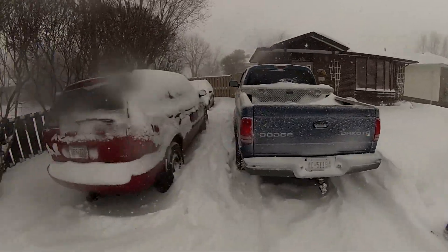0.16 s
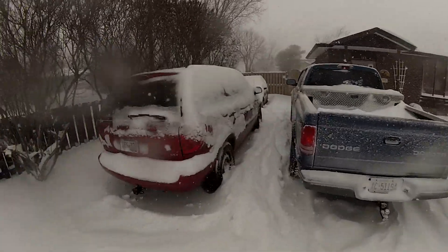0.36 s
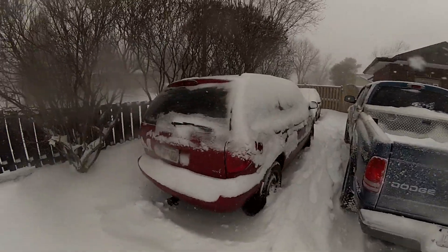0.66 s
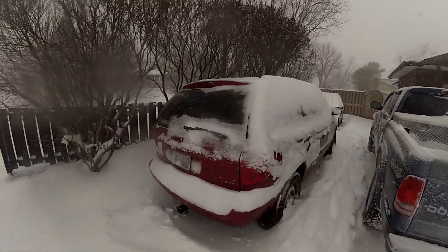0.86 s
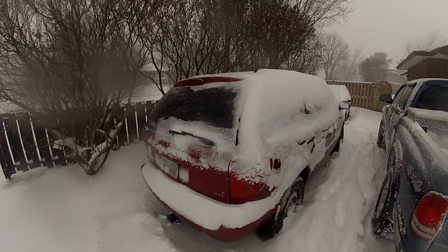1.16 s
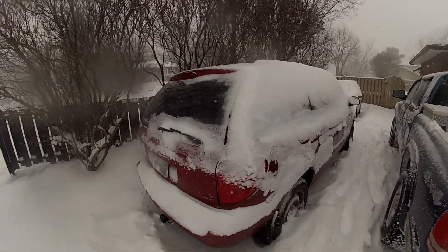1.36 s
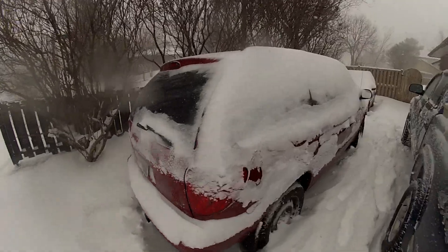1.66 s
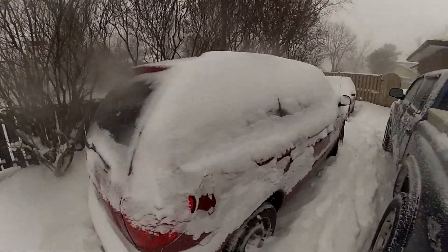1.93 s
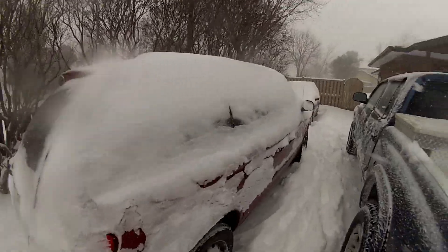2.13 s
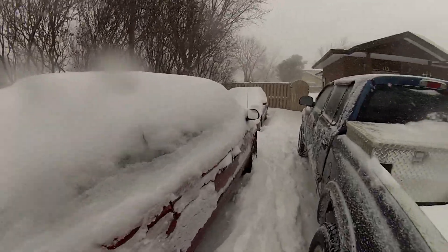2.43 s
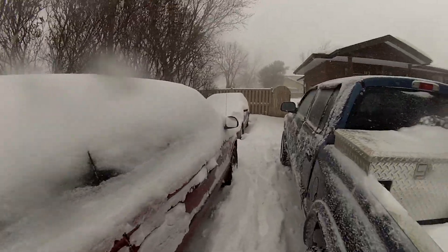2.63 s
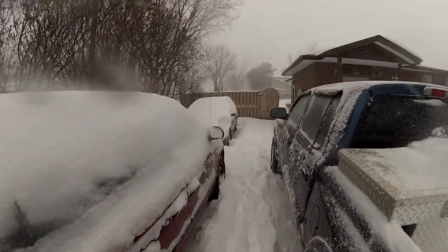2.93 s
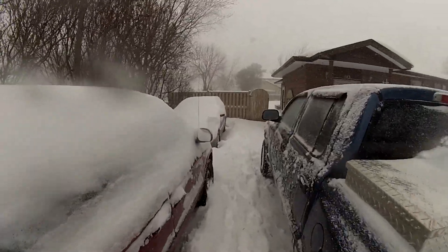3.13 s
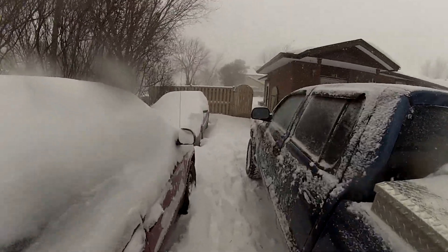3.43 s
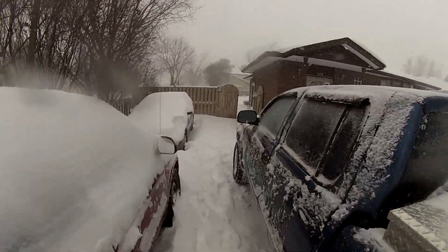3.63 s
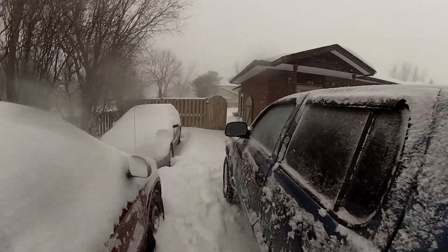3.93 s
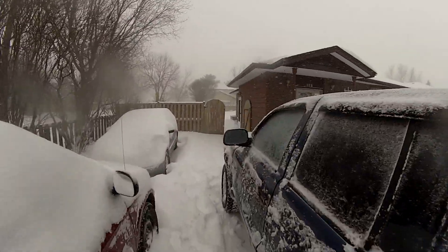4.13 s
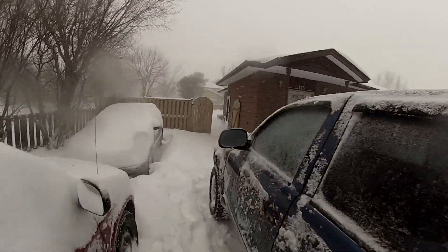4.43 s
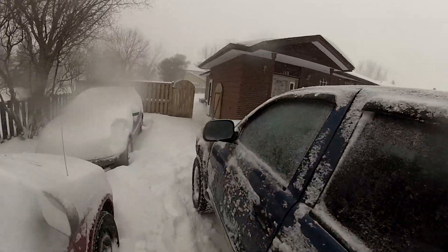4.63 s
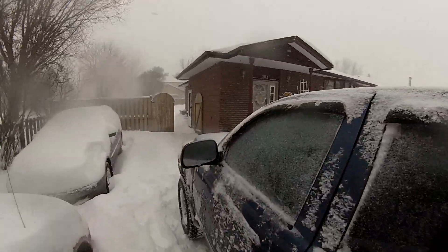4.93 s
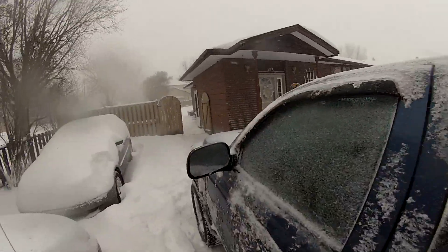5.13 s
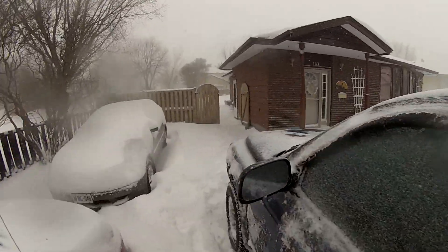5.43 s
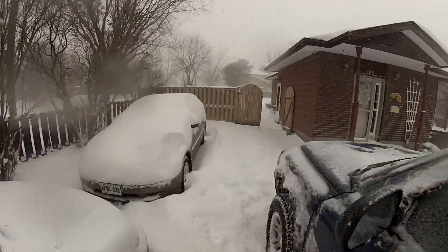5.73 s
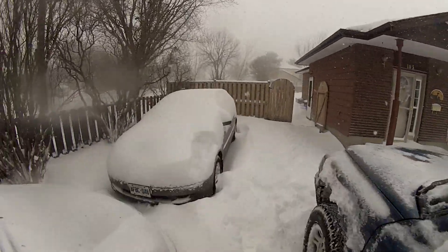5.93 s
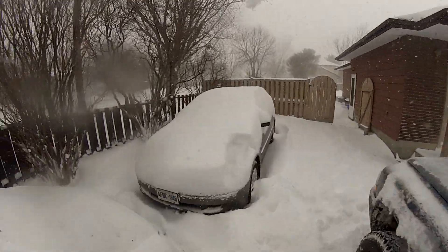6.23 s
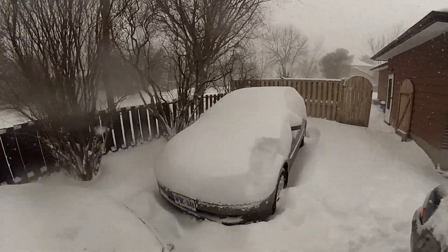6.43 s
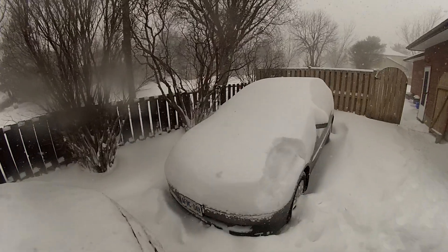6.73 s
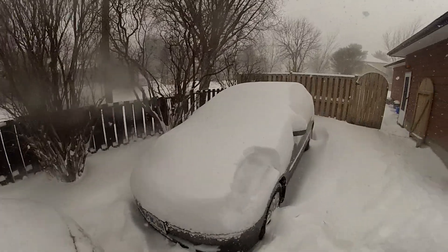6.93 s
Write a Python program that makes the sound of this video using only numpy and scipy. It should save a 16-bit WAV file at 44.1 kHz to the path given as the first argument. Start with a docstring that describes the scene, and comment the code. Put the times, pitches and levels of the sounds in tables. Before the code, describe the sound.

Strong blizzard wind buffets a small microphone outdoors, a loud uneven low rumble with hard thumps, a few sharp icy clicks, easing at the end.

```python
"""A blizzard at the microphone port of a small camera carried between parked cars. From the start a breeze
rumbles at the port as noise eddies, bare trees behind rush and hiss, and fine grains patter. From 0.1 s gusts
swell, with lulls between, and hard buffets hit as single pressure peaks that rasp at their crests. From 0.8 s
grains tick and icy clumps smack as ringing noise bursts, and snow swishes softly in bands of noise. From about
2.5 s the branches whistle as a wandering hoarse tone; past 5.5 s the buffets end and the wind eases."""
import sys
import numpy as np
from scipy import signal
from scipy.fft import rfft, irfft
from scipy.io import wavfile
from scipy.ndimage import uniform_filter1d

SR = 44100
rng = np.random.default_rng(int(sys.argv[2]) if len(sys.argv) > 2 else 0)


def persist_wave(psi):
    """Save psi, clipped to +-1, as 16-bit WAV."""
    counts = np.round(np.clip(psi, -1, 1) * 32767).astype(np.int16)
    wavfile.write(sys.argv[1], SR, np.atleast_2d(counts).T)


N = 311787
T = np.arange(N) / SR
FREQS = np.fft.rfftfreq(N, 1 / SR) + 1e-3  # the offset keeps logarithms finite

# Level and strength columns are settings, before the trims in the functions and the diaphragm.
# Breeze at the port: (time [s], large eddy level [dB], middle eddy level [dB])
BREEZE_LEVELS = [(0.0, -31, -31), (0.72, -30, -34), (0.97, -31.5, -54), (1.33, -29, -36.5),
                 (1.57, -32, -47.5), (1.92, -34.5, -39.5), (2.17, -27.5, -31), (2.69, -28.5, -64),
                 (3.1, -20, -34.5), (3.45, -24, -34.5), (4.05, -25.5, -37.5), (5.3, -20.5, -26.5),
                 (5.98, -40, -47), (6.55, -39, -57), (7.07, -39, -42.5)]
# Gusts at the port: (start [s], hold [s], large eddy level [dB], middle eddy level [dB])
GUST_EVENTS = [(0.115, 0.13, -20.5, -27), (0.763, 0.057, -25, -30), (0.885, 0.016, -28.5, -38),
               (1.045, 0.2, -24, -34), (1.712, 0.013, -24, -32), (2.154, 0.014, -29, -40),
               (2.227, 0.12, -20, -60), (2.425, 0.099, -35, -30), (2.546, 0.056, -24, -30),
               (2.742, 0.021, -27, -29.5), (2.851, 0.087, -20, -45), (3.004, 0.013, -37, -23),
               (3.189, 0.037, -17.5, -25), (3.26, 0.059, -22, -23), (3.787, 0.012, -26, -25),
               (3.904, 0.011, -18, -36), (4.111, 0.033, -17.5, -29), (4.315, 0.031, -39, -25),
               (4.542, 0.26, -21.5, -25), (4.803, 0.36, -28, -21.5), (5.224, 0.22, -27, -39),
               (5.453, 0.08, -22.5, -23), (5.638, 0.15, -24.5, -33), (6.178, 0.11, -35, -50.5),
               (6.918, 0.12, -35.5, -42.5)]
# The wind drops out between gusts: (time [s], depth [dB], half length [s])
LULL_EVENTS = [(0.612, 7.5, 0.023), (0.945, 19, 0.019), (0.993, 14, 0.02), (1.635, 13, 0.014),
               (2.382, 12, 0.018), (2.831, 13, 0.019), (3.706, 5.5, 0.03), (3.928, 13, 0.032),
               (4.01, 7.5, 0.037), (4.425, 7.5, 0.028)]
# Eddy spectrum at the port: (frequency [Hz], relative density [dB])
EDDY_SPECTRUM = [(12, -5.5), (25, 3), (70, 3), (110, -5.5), (180, -16.5), (300, -22), (420, -33),
                 (700, -70.5), (1100, -70.5), (1800, -81)]
# Storm in the trees behind: (time [s], rush level [dB], high hiss level [dB])
STORM_LEVELS = [(0.0, -57.5, -70), (0.9, -56.5, -69.5), (1.6, -58, -69.5), (2.2, -58, -68.5),
                (2.5, -57, -68.5), (3.35, -55, -67), (4.55, -55, -66.5), (4.95, -58.5, -74),
                (5.95, -55, -82), (6.5, -56.5, -87), (7.07, -56.5, -73)]
# Spectrum of the rush in the trees: (frequency [Hz], relative density [dB])
TREE_SPECTRUM = [(100, -0.5), (200, 8), (370, 2.5), (550, 0.5), (800, -4), (1200, -0.5), (2000, -2.5),
                 (3000, -8), (4500, -14.5), (7000, -21), (15000, -26)]
# Spectrum of the high hiss: (frequency [Hz], relative density [dB])
HISS_SPECTRUM = [(2000, -35), (5000, 6), (9000, 3.5), (12000, 10), (14800, 9.5), (15600, -5)]
# Hard buffets at the port: (time [s], strength [dB], half width [ms])
BUFFET_EVENTS = [(0.121, -11, 2.3), (0.184, -8.5, 0.87), (0.236, -12, 1.2), (0.577, -15.5, 2.2),
                 (0.829, -4.5, 0.98), (0.839, -15, 2.2), (1.134, -10, 3.4), (1.216, -9.5, 2.56),
                 (2.271, -16, 1.08), (2.861, -9.5, 2.3), (2.907, -10.5, 3.3), (2.932, -5, 0.93),
                 (2.940, -6.5, 0.79), (2.949, -6, 1.74), (3.201, -14, 1.04), (3.236, -4, 1.3),
                 (3.282, -10, 0.98), (3.966, -13, 2.2), (4.039, -34, 0.24), (4.133, -6, 1.9),
                 (4.154, -10, 1.56), (4.162, -3.5, 0.8), (4.217, -8, 2.24), (4.333, -9.5, 1.26),
                 (4.562, -5.5, 0.99), (4.679, -10, 0.5), (4.684, -4, 0.51), (4.698, -15, 0.54),
                 (4.733, -3.5, 0.76), (4.757, -11, 0.51), (4.847, -14.5, 0.46), (4.881, -8, 0.75),
                 (4.917, -7, 0.6), (5.009, -1, 1.1), (5.129, -9, 0.87), (5.15, -15.5, 0.68),
                 (5.171, -3, 0.59), (5.261, -10, 3.1), (5.335, -7.5, 1.08), (5.363, -10.5, 2.5),
                 (5.394, -11, 3.5), (5.528, -9, 1.55)]
# Spectrum of the overloaded microphone's rasp: (frequency [Hz], relative density [dB])
RASP_SPECTRUM = [(600, -9), (1900, 7.5), (2700, -1.5), (3800, 1), (6000, -7), (10000, -10.5), (15000, -24)]
# Hard snow grains on the housing:
# (time [s], strength [dB], body below 4 kHz relative to the tick [dB], ringing pitch [Hz])
GRAIN_EVENTS = [(0.7757, -31.5, -6, 12000), (0.8133, -22.5, -10, 8300), (0.818, -26, -12, 6600),
                (0.8293, -23.5, -3, 3550), (0.8545, -28, -27, 5700), (1.115, -29, -24, 9900),
                (1.311, -29.5, -28, 6600), (2.001, -30.5, -23, 5000), (2.7229, -24, -1.5, 9000),
                (2.7543, -29, 0, 8700), (2.7897, -19, -5, 5200), (3.307, -25, -21, 11900),
                (3.486, -25.5, -18, 5030), (3.702, -26.5, -7, 13400), (4.135, -28, -1.5, 4300),
                (4.5743, -21.5, -9, 13000), (4.5915, -19.5, -6.5, 3300), (4.617, -29, -16, 7000),
                (4.6468, -18.5, -15, 12000), (5.263, -34, 1.5, 3200), (5.511, -28, -25, 10000),
                (5.6364, -27, -9, 4400), (6.461, -32, -7, 9800), (6.722, -31, -12, 14000)]
# Spectrum of a grain's tick: (frequency [Hz], relative density [dB])
TICK_SPECTRUM = [(1800, -18), (3500, 2.5), (9000, -1), (16000, -3)]
# Spectrum of a grain's body: (frequency [Hz], relative density [dB])
BODY_SPECTRUM = [(400, -2), (1200, 5.5), (3600, -3.5), (6500, -47)]
# Clumps of icy snow striking the port: (time [s], strength [dB])
CLUMP_EVENTS = [(0.8285, -28), (3.2, -8), (3.2044, -19), (4.218, -31), (5.007, -42)]
# Spectrum of a crumbling clump: (frequency [Hz], relative density [dB])
CLUMP_SPECTRUM = [(200, 9.5), (500, 9), (1200, -7.5), (2400, -10.5), (3300, -15), (4500, -8), (6000, -15.5),
                  (10700, -13), (15000, -22)]
# Soft swishes in the snow: (time [s], level [dB], half length [s], centre [Hz])
SWISH_EVENTS = [(0.898, -57, 0.026, 5500), (3.358, -56.5, 0.044, 6100), (6.789, -53, 0.026, 1650)]
# Whistling in the branches: (time [s], level [dB], half length [s])
WHISTLE_EVENTS = [(2.554, -59.5, 0.3), (3.47, -59, 0.36), (4.529, -56.5, 0.07), (6.102, -61, 0.28)]
# The level of the background rush, hiss and whistle dips briefly: (time [s], depth [dB])
BACKGROUND_DIPS = [(2.97, 9), (4.239, 7.5), (4.77, 7.5)]

GUST_ATTACK_S, GUST_RELEASE_S = 0.0062, 0.011  # of a brief puff
GUST_LINGER = 0.36  # extra release per second of hold: long gusts die away slowly
GALE_DB = -19.5  # level of the middle eddies in a full gale
CORES_PER_S, CORE_WIDTH_S = 51, 0.00064  # tiny eddy cores in such a gale
PATTER_GRAINS, PATTER_LOWEST_HZ = 70, 5830
PATTER_FAINTEST_DB, PATTER_SPREAD_DB = -41, 10.5  # least strength, and the range above it
RING_DB, RING_OCTAVES = 7, 0.16  # height and half width of the resonance of a piece of ice
WHISTLE_HZ, WHISTLE_RISE_HZ, WHISTLE_WANDER_HZ = 1386, 35.06, 26.93
DIP_ONSET_S, RECOVERY_DB_PER_S = 0.056, 55
TOP_HZ = 15700


def undb(db):
    """Decibels to gain."""
    return 10 ** (np.asarray(db) / 20)


def unit(x):
    """Scale to rms 1."""
    return x / np.std(x)


def curves(table):
    """Each column of a table, joined by straight lines in time."""
    times, *columns = np.transpose(table)
    return [np.interp(T, times, column) for column in columns]


def colour(points):
    """Gain at every frequency from (frequency [Hz], density [dB]) points."""
    hz, db = np.transpose(points)
    return undb(np.interp(np.log(FREQS), np.log(hz), db))


def noise(gain):
    """Noise of rms 1, shaped by a gain at every frequency."""
    return unit(irfft(rfft(rng.standard_normal(N)) * gain, N))


def walk(rate):
    """Slow chance of spread 1, moving about rate times a second."""
    return noise(np.exp(-(FREQS / rate) ** 2))


def below(hz, order=8):
    """Low-pass gain, steep by default."""
    return 1 / (1 + (FREQS / hz) ** order)


def steady(x, seconds):
    """Even out the slow swells of a noise, keeping its quick ones."""
    power = uniform_filter1d(x ** 2, max(int(seconds * SR), 2))
    return x / np.sqrt(power + 1e-6)


def burst_shape(age, rise, decay):
    """A quick rise [s] and an exponential fall [s]."""
    return (1 - np.exp(-age / rise)) * np.exp(-age / decay)


def strikes(times, dbs, rise, decay):
    """Envelope of short blows, each a burst with its own peak level."""
    out = np.zeros(N)
    shape = burst_shape(T[:SR // 10], rise, decay)
    for time, db in zip(times, dbs):
        part = out[int(time * SR):][:len(shape)]
        part += undb(db) * shape[:len(part)] / shape.max()
    return out


def crackle(time, db, rise, decay, points, ring_hz):
    """A millisecond or two of crumbling, evened over the spectrum, then coloured and given one resonance."""
    out = np.zeros(N)
    age = np.maximum(T[:2048] - T[1024], 0)
    shape = burst_shape(age, rise, decay)
    spectrum = rfft(shape * rng.standard_normal(len(age)))
    spectrum = spectrum / np.sqrt(uniform_filter1d(np.abs(spectrum) ** 2, size=48))
    hz, colour_db = np.transpose(points)
    octaves = np.log2(np.fft.rfftfreq(len(age), 1 / SR) + 1)
    ring_db = RING_DB * np.exp(-((octaves - np.log2(ring_hz)) / RING_OCTAVES) ** 2)
    gain = undb(np.interp(octaves, np.log2(hz), colour_db) + ring_db)
    burst = unit(irfft(spectrum * gain))
    part = out[max(int(time * SR) - len(age) // 2, 0):][:len(age)]
    part += undb(db) * np.std(shape / shape.max()) * burst[:len(part)]
    return out


def wind_levels():
    """Large and middle eddy levels in dB: gusts add power to the breeze and die away; lulls cut both."""
    power = undb(curves(BREEZE_LEVELS)) ** 2
    for start, hold, large_db, middle_db in GUST_EVENTS:
        early = np.maximum(start - T, 0)
        late = np.maximum(T - start - hold, 0)
        release = GUST_RELEASE_S + GUST_LINGER * hold
        swell = np.exp(-early / GUST_ATTACK_S - late / release)
        power = power + np.outer(undb([large_db, middle_db]), swell) ** 2
    lull_db = sum(depth_db * np.exp(-((T - time) / length) ** 4)
                  for time, depth_db, length in LULL_EVENTS)
    return 10 * np.log10(power) - lull_db


def tiny_cores(middle_db):
    """Tiny eddy cores crowd in as the wind nears a gale and keep its rumble ragged between hard buffets."""
    chance = CORES_PER_S / SR * undb(middle_db - GALE_DB) ** 2
    passing = rng.random(N) < chance
    pushes = passing * rng.choice([-1, 1], N) * undb(middle_db + 3.2)
    # spectrum of one narrow pressure peak
    peak = np.pi * CORE_WIDTH_S * SR * np.exp(-2 * np.pi * FREQS * CORE_WIDTH_S)
    above = 1 - below(hz=300, order=2)
    return irfft(rfft(pushes) * peak * above, N)


def rumble():
    """Turbulence at the port in three sizes; small eddies ride larger crests and grow fastest in a gust."""
    large_db, middle_db = wind_levels()
    small_db = middle_db - 17.5 + 0.32 * (middle_db + 24.5)
    gain = colour(EDDY_SPECTRUM)
    deep, slow, quick = below(hz=51.1), below(hz=100.3), below(hz=289)
    # in a lull mostly the deepest eddies are left
    stir = np.clip((middle_db + 52) / 32, .12, .9)
    large = noise(gain * deep) + stir * noise(gain * (slow - deep))
    large = steady(large, seconds=0.0351)
    # in a gale the eddies overlap and their level scatters less
    scatter_db = np.interp(middle_db, [GALE_DB - 9, GALE_DB], [8.0, 5.5])
    middle = noise(gain * (quick - slow)) * undb(scatter_db * walk(rate=40.5))
    middle = steady(middle, seconds=0.0504)
    crests = 0.23 + np.abs(large + middle)
    small = noise(gain * (1 - quick)) * crests * undb(3.6 * walk(rate=71))
    small = steady(small, seconds=.05)
    eddies = undb(large_db + 1.0) * large + undb(middle_db) * middle + undb(small_db) * small
    return eddies + tiny_cores(middle_db)


def storm():
    """Distant turbulence in the branches: a wavering low roar and a steadier rush, under a smooth high hiss."""
    rush_db, hiss_db = curves(STORM_LEVELS)
    gain, low = colour(TREE_SPECTRUM), below(hz=1188)
    waver = undb(.7 * walk(rate=10))
    roar = noise(gain * low) * waver * undb(8.0)
    rush = noise(gain * (1 - low)) * undb(-0.57)
    hiss = noise(colour(HISS_SPECTRUM))
    return undb(rush_db) * (roar + rush) + undb(hiss_db) * hiss


def grain_tick(time, strength_db, ring_hz):
    """One hard grain on the housing: a short crackle ringing at its own pitch."""
    return crackle(time, strength_db - 15.0, rise=0.001, decay=0.00053, points=TICK_SPECTRUM, ring_hz=ring_hz)


def patter():
    """Fine grains land on the housing at random, mostly faint, their pitches spread over an octave."""
    out = np.zeros(N)
    for when, size, octave in rng.random(size=(PATTER_GRAINS, 3)):
        strength_db = PATTER_FAINTEST_DB + PATTER_SPREAD_DB * size ** 2
        out += grain_tick(when * T[-1], strength_db, PATTER_LOWEST_HZ * 2 ** octave)
    return out


def buffets():
    """An eddy core crosses the port: a pressure peak of either sign in a ragged flutter of the same scale."""
    out = np.zeros(N)
    age = T[:4096] - T[2048]
    hz = np.fft.rfftfreq(len(age), 1 / SR)
    for time, db, ms in BUFFET_EVENTS:
        width = ms / 1000
        # the peak is flanked by shallow dips of the opposite sign
        core = 1 / (1 + (age / width) ** 2) - 0.24 / (1 + (age / width / 4) ** 2)
        flutter = irfft(rfft(rng.standard_normal(len(age))) * hz * np.exp(-8.5 * hz * width))
        flutter = steady(unit(flutter), seconds=0.059) * np.exp(-(age / 0.0095) ** 2)
        sign = rng.choice([-1, 1])
        start = int(time * SR) - len(age) // 2
        out[start:start + len(age)] += undb(db) * (sign * undb(4.0) * core + undb(-18.0) * flutter)
    return out


def rasp():
    """Broad, strong buffets overload the microphone: a brief burst of rasping noise at their crest."""
    times, db, ms = np.transpose(BUFFET_EVENTS)
    push_db = np.minimum(1.88 * db + 20 * np.log10(ms), -5)
    envelope = strikes(times - .001, push_db - 35.5, rise=0.00073, decay=0.0017)
    return envelope * noise(colour(RASP_SPECTRUM))


def snow_grains():
    """Larger grains strike the housing: a ringing tick, with a lower burst of noise as the body of each."""
    times, db, body_db, ring_hz = np.transpose(GRAIN_EVENTS)
    ticks = sum(grain_tick(*grain) for grain in zip(times, db, ring_hz))
    envelope = strikes(times, db + body_db - 10.0, rise=0.0013, decay=0.00097)
    return ticks + envelope * noise(colour(BODY_SPECTRUM))


def ice_smack():
    """Each icy clump hits the port and crumbles within a few milliseconds."""
    return sum(crackle(time, db - 5.0, rise=0.00052, decay=0.0012, points=CLUMP_SPECTRUM, ring_hz=2950)
               for time, db in CLUMP_EVENTS)


def swishes():
    """Snow swishes in soft, grainy swells, each a couple of octaves wide."""
    out = np.zeros(N)
    for time, db, length, hz in SWISH_EVENTS:
        swell = np.exp(-((T - time) / length) ** 2)
        band = np.exp(-np.log2(FREQS / hz) ** 2)
        out += undb(db) * swell * noise(band)
    return out * undb(2.1 * walk(rate=300))


def whistle():
    """Wind whistles hoarsely in the branches; its pitch wanders and rises as it swells."""
    swell = sum(undb(db) * np.exp(-((T - time) / length) ** 2) for time, db, length in WHISTLE_EVENTS)
    hz = WHISTLE_HZ + WHISTLE_RISE_HZ * swell / swell.max() + WHISTLE_WANDER_HZ * walk(rate=6.75)
    tone = np.sqrt(2) * np.sin(2 * np.pi * np.cumsum(hz) / SR)
    hoarseness = noise(below(hz=62, order=2))
    return swell * hoarseness * tone


def background_dips():
    """Gain that drops quickly at each listed time and climbs back at a steady rate in dB."""
    down_db = np.zeros(N)
    for time, depth_db in BACKGROUND_DIPS:
        recovered = time + depth_db / RECOVERY_DB_PER_S
        down_db += np.interp(T, [time - DIP_ONSET_S, time, recovered], [0, depth_db, 0])
    return undb(-down_db)


def scene():
    """Wind at the port, snow on the housing and the storm in the trees behind."""
    # each hard buffet sweeps a little of the ordinary turbulence aside for a moment
    swept = sum(np.exp(-((T - time) / 0.0013) ** 2) for time, _, _ in BUFFET_EVENTS)
    pressure = rumble() / (1 + 0.073 * swept) + buffets()
    # the diaphragm rounds the hardest pushes
    wind = 0.77 * np.tanh(pressure / 0.71)
    background = (storm() + whistle()) * background_dips()
    snow = patter() + snow_grains() + ice_smack() + swishes()
    return (wind + rasp() + background + snow)[None]


def record(dry):
    """The camera cuts the top with a steep elliptic low-pass."""
    return signal.sosfilt(signal.ellip(8, .2, 80, TOP_HZ, fs=SR, output="sos"), dry)


dry = scene()
out = record(dry)
persist_wave(out)
```